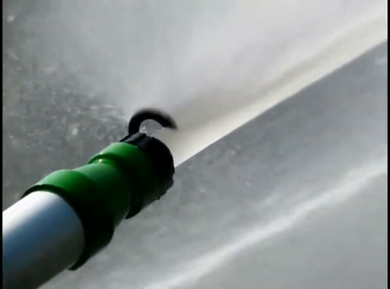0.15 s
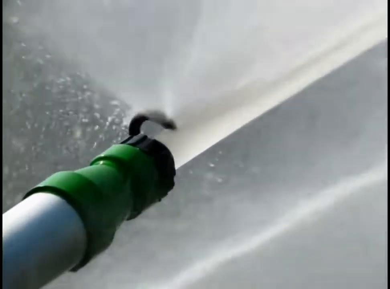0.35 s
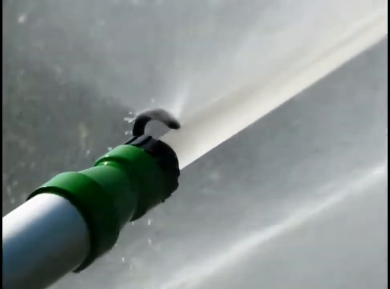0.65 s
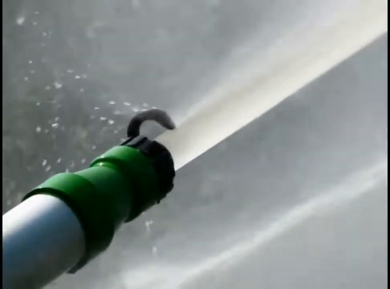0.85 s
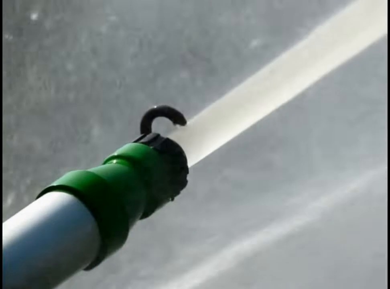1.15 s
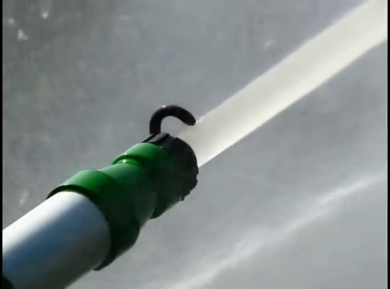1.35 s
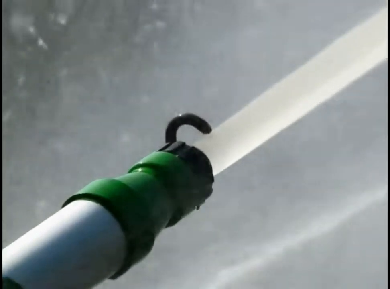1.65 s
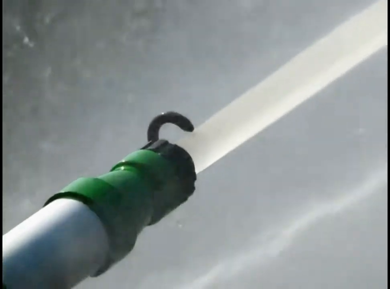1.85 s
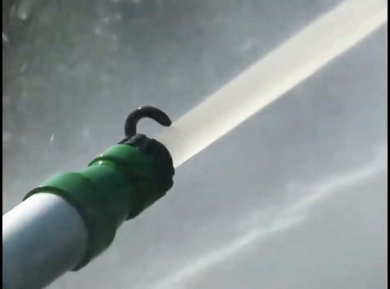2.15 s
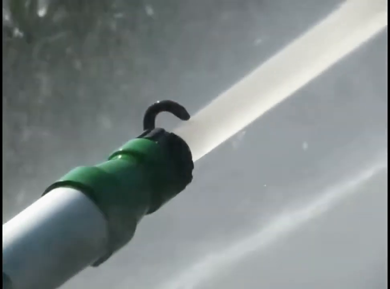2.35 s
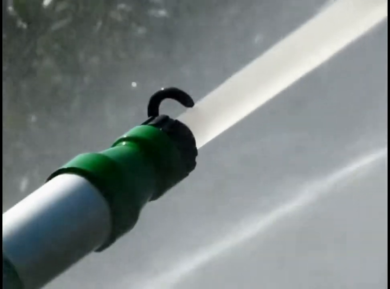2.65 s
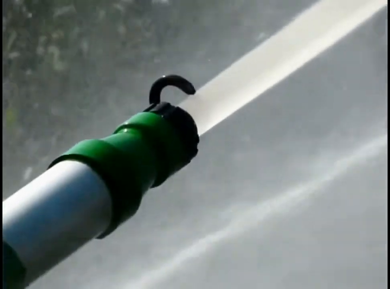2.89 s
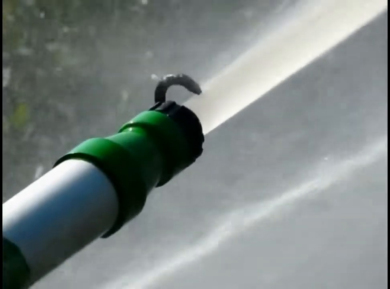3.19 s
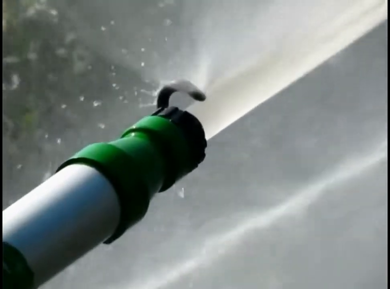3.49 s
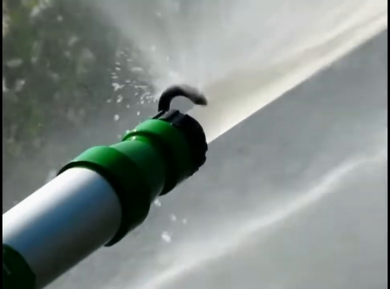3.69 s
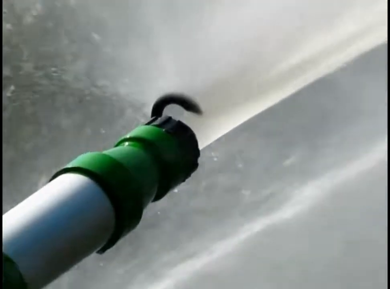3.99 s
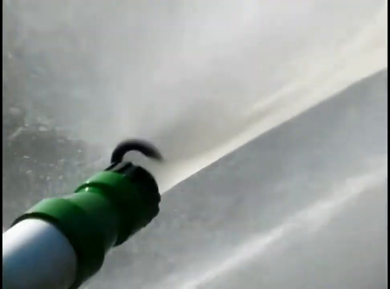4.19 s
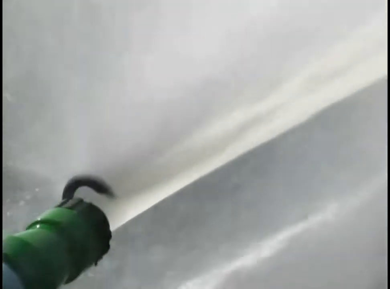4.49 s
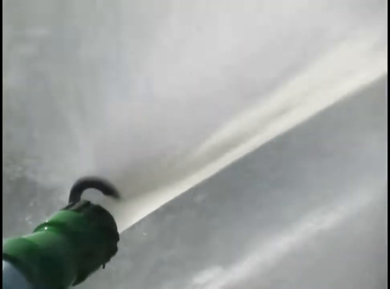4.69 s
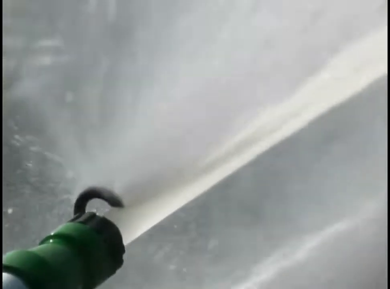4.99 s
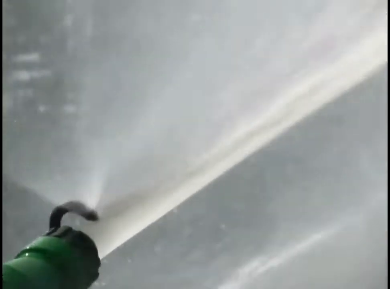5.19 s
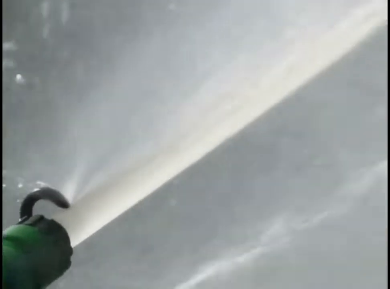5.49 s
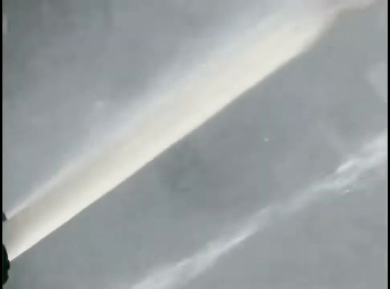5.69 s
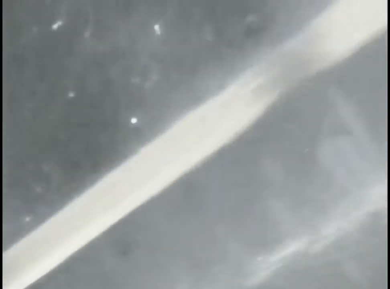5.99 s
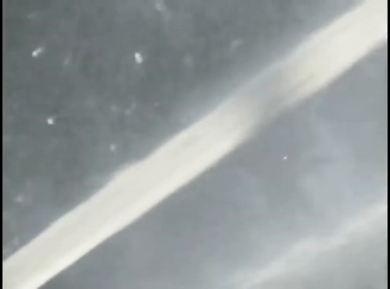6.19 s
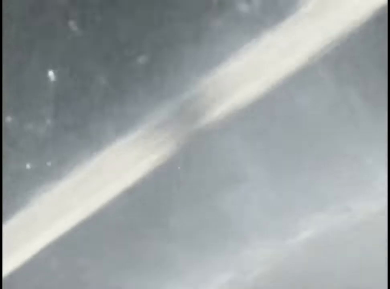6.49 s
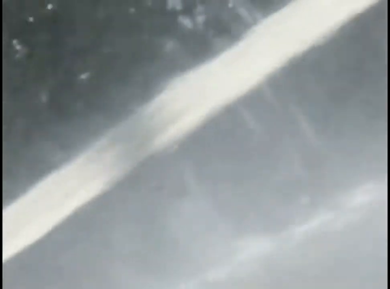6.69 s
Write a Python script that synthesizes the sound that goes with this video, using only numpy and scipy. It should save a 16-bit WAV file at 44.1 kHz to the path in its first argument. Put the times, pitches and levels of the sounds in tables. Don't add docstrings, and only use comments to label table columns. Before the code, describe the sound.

Pressurised water hisses softly outdoors, surges into a loud coarse splatter, thins to faint spray, then returns heavier with hard single drop smacks.

```python
import sys
import numpy as np
from scipy import signal
from scipy.fft import rfft, irfft, next_fast_len
from scipy.io import wavfile

SR = 44100
rng = np.random.default_rng(int(sys.argv[2]) if len(sys.argv) > 2 else 0)


def boost(x):
    u = np.asarray(x, float) / 20
    return 10 ** u


def master_out(mix):
    frames = np.transpose(np.atleast_2d(mix))
    ceiling = np.clip(frames, -1, 1)
    pcm = np.round(ceiling * 32767).astype(np.int16)
    wavfile.write(sys.argv[1], SR, pcm)


N = 302085
STEP = 40
CONTROL_S = np.arange(N // STEP + 2) * STEP / SR
FFT_SIZE = next_fast_len(N)
HZ = np.arange(FFT_SIZE // 2 + 1) * SR / FFT_SIZE


def rms_one(x):
    return x / np.sqrt(np.mean(x ** 2) + 1e-20)


def in_time(rows):
    s, *columns = np.transpose(rows)
    return np.array([np.interp(CONTROL_S, s, column) for column in columns])


def per_sample(control):
    return np.interp(np.arange(N) / STEP, np.arange(len(control)), control)


def at_hz(points, hz):
    table_hz, value = np.transpose(points)
    return np.interp(np.log(hz + 1), np.log(table_hz + 1), value)


def drift(rate_hz):
    r = np.exp(-2 * np.pi * rate_hz * STEP / SR)
    settle = 2000
    noise = rng.standard_normal(len(CONTROL_S) + settle)
    return rms_one(signal.lfilter([1], [1, -2 * r, r * r], noise)[settle:])


def pair(streams, spectrum, likeness, balance, lead):
    shared, left, right = rfft(streams, FFT_SIZE)
    alike = np.clip(at_hz(likeness, HZ), 0, 1)
    turn = np.exp(.5j * at_hz(lead, HZ))
    ports = np.sqrt(alike) * shared * [turn, 1 / turn] + np.sqrt(1 - alike) * np.array([left, right])
    return ports * boost(at_hz(spectrum, HZ) + at_hz(balance, HZ) * np.array([[.5], [-.5]]))


# (t/s, level/dB)
WIND_LEVEL = [
    (0, -65),
    (0.9, -62),
    (1.2, -58),
    (1.4, -67.5),
    (2.8, -70),
    (3.5, -77),
    (4.8, -70),
    (5.17, -68),
    (5.3, -69),
    (6.85, -70.5),
]
# (f/Hz, level/dB per Hz)
WIND_TONE = [(12, -35), (20, -6), (59, 3), (100, -2), (130, -31), (220, -120)]
RUMBLE_TONE = [(59, -39), (100, -9.5), (167, 2), (280, -5.5), (360, -20), (620, -120)]


def wind_and_rumble():
    gust_db, gusts_per_s, rumble_over_wind_db = 2, 6.9, 11
    out, (wind_db,) = 0, in_time(WIND_LEVEL)
    for tone, alike, over_db in [(WIND_TONE, .42, 0), (RUMBLE_TONE, .8, rumble_over_wind_db)]:
        ports = pair(rng.standard_normal((3, N)), tone, [(20, alike)], [(20, -.5)], [(20, 0)])
        gusts_db = gust_db * drift(gusts_per_s)
        sound = rms_one(irfft(ports, FFT_SIZE)[:, :N])
        out = out + sound * per_sample(boost(wind_db + over_db + gusts_db))
    return out


def echoes(first_db, t60):
    lags = rng.uniform(.006, .045, (2, 12))
    lags[1, :8] = lags[0, :8]
    gains = boost(first_db - 60 * lags / t60)
    treble = HZ ** 2 / (HZ ** 2 + 3000 ** 2)
    reflected = sum(gains[:, [k]] * np.exp(-2j * np.pi * HZ * lags[:, [k]]) for k in range(12))
    return 1 + treble * reflected


# (f/Hz, width/Hz, left boost/dB, right boost/dB)
SHELTER_NOTES = [(537, 64, 5.5, 2), (800, 47, 3, 2), (979, 32, 6.5, 7.5), (1196, 47, 7, 7.5),
                 (1511, 30, -1.5, 9), (1634, 51, 9, 6), (2057, 31, 7, 9), (2585, 67, 1, 7.5),
                 (2944, 390, 2.5, 3.5), (3390, 100, 2, 6), (4980, 47, 4.5, -9)]


def shelter_colour():
    response = np.ones((2, len(HZ)), complex)
    for peak_hz, width_hz, left_db, right_db in SHELTER_NOTES:
        peak = 1 / (1 + 2j * (HZ - peak_hz) / width_hz)
        response += (boost(np.array([[left_db], [right_db]])) - 1) * peak
    return response


def patter(per_s, spread_db, cycles):
    lands = rng.random((3, N)) < per_s / SR
    sizes = boost(spread_db * np.minimum(rng.exponential(1, (3, N)), 3.3))
    hits = lands * sizes * rng.choice([-1, 1], (3, N))
    dealt, out = rng.integers(0, 14, (3, N)), 0
    for k, pitch_hz in enumerate(np.geomspace(500, 14000, 14)):
        r, w = boost(-60 * pitch_hz / (cycles * SR)), 2 * np.pi * pitch_hz / SR
        ring = [1, -2 * r * np.cos(w), r * r]
        out = out + signal.lfilter([1 - r * r, 0, r * r - 1], ring, hits * (dealt == k) + 1e-18)
    return rms_one(out)


# (t/s, level/dB, weight: 0 fine and bright, 1 heavy and low)
FALLING_WATER = [(0, -25, -0.04), (0.72, -25, 0.04), (1.12, -23, 0.12), (1.26, -19, -.3),
                 (1.41, -20, -0.16), (1.96, -19, -0.44), (2.25, -19, -0.24), (2.55, -21, -0.22),
                 (2.82, -21, -0), (3.25, -23, 0.02), (3.42, -29, -0.52), (3.6, -34, 0.13),
                 (4.62, -30.5, 0.31), (4.97, -27.5, 0.16), (5.14, -23, 0.77), (6.2, -23, 0.76),
                 (6.6, -22.5, 0.46), (6.85, -23, -0.26)]
# (f/Hz, level/dB)
FULL_WEIGHT = [(300, 7.5), (600, 13), (2000, 5.5), (6000, 0.2), (13000, 0)]


def water(ports, surge_db, surge_rate, patch_db, patch_rate):
    slug_octaves = 0.93
    own_db = 10 * np.log10((np.abs(ports.mean(0)) ** 2).sum() * 2 / FFT_SIZE / N)
    (level_db, weight), (slug_db, slug_hz) = in_time(FALLING_WATER), slugs()
    surge, neighbour, out = drift(surge_rate), drift(patch_rate), 0
    centres = np.log(250) + np.log(2) / 2 * np.arange(13)
    for k, centre in enumerate(centres):
        window = np.interp(np.log(HZ + 1), centres, np.arange(13) == k)
        band_db = level_db - own_db + weight * at_hz(FULL_WEIGHT, np.exp(centre))
        octaves_off = np.log2(np.exp(centre) / slug_hz)
        band_db = band_db + np.exp(-.5 * (octaves_off / slug_octaves) ** 2) @ slug_db
        fresh = drift(patch_rate)
        flicker_db = surge_db * surge + patch_db * (neighbour + fresh)
        neighbour = fresh
        band = irfft(ports * window, FFT_SIZE)[:, :N]
        out = out + per_sample(boost(band_db + flicker_db)) * band
    return out


# (f/Hz, level/dB per Hz)
SPRAY_TONE = [(150, -28), (260, -14), (572, -8.5), (864, -8.5), (1200, -4.5), (1370, -5.5), (1600, -5),
              (1840, -4), (2550, -2), (5060, -4), (7900, 0.5), (12600, -6), (15700, -9)]
# (f/Hz, left lead/rad)
SPRAY_PORTS = [
    [(130, .6), (600, .75), (1500, .6), (2500, .45), (4500, .42), (7500, .6), (10000, .45), (15000, .35)],
    [(60, -0.5), (110, -1.0), (200, -0.5), (380, -2.0), (700, -2.0), (1290, -3.5), (2380, -4.0), (4400, -0.5), (8120, 0.5), (15000, -1.0)],
    [(0, 0), (900, -.5), (2300, 0), (3700, .7), (5200, 0), (9500, -.5), (11300, 0), (14000, .7)],
]


def spray(walls):
    streams = rng.standard_normal((3, N)) + .5 * patter(per_s=1500, spread_db=3.0, cycles=6.5)
    ports = pair(streams, SPRAY_TONE, *SPRAY_PORTS)
    hollow = 1 + .5 / (1 + 2j * (HZ - 610) / 130)
    coloured = ports * walls * shelter_colour() ** 0.35 * hollow
    return water(coloured, surge_db=.5, surge_rate=26.0, patch_db=0.22, patch_rate=14.0)


# (f/Hz, level/dB per Hz)
JET_TONE = [(150, -55), (260, -26), (336, -13.5), (716, -16), (780, -5.5), (910, -10), (1180, -7),
            (1840, -3), (2070, -1), (2260, -2.5), (8180, 0.5), (14200, -8), (15700, -12.5)]
# (f/Hz, left lead/rad)
JET_PORTS = [
    [(130, .9), (500, .75), (1500, .65), (2500, .5), (4500, .5), (5600, .65), (8500, .6), (10000, .42), (12000, .55), (15000, .45)],
    [(60, 0.0), (110, -0.5), (200, -0.5), (380, -1.5), (700, -3.0), (1290, -3.0), (2380, -4.5), (4400, -1.5), (8120, -0.5), (15000, -1.0)],
    [(0, 0), (1000, -.5), (2200, 0), (3200, .2), (5000, 0), (7400, -.6), (9700, -.4), (11000, -2.2), (13000, -2.1), (14200, -1)],
]


def jet(walls, coarse):
    streams = rng.standard_normal((3, N)) + coarse * patter(per_s=900, spread_db=3.5, cycles=9.2)
    ports = pair(streams, JET_TONE, *JET_PORTS)
    coloured = ports * walls * shelter_colour()
    return water(coloured, surge_db=1.09, surge_rate=42.0, patch_db=0.32, patch_rate=71.0)


# (t/s, level/dB, f/Hz,
# length/s)
SLUG_LANDINGS = [(1.187, 6.5, 350, 0.033), (1.26, 3.5, 10000, 0.023), (1.318, 6.5, 1990, 0.015),
                 (1.36, -3, 500, 0.018), (1.697, 2.5, 7000, 0.013), (1.76, 3.5, 4000, 0.016),
                 (2.04, 2.5, 8000, .025), (2.2, 1.5, 2200, 0.06), (2.305, -3.5, 2500, 0.026),
                 (2.445, 3, 1800, 0.043), (2.56, -4, 2500, 0.013), (2.66, 4, 3000, 0.016),
                 (2.76, 1, 1800, 0.014), (2.837, 7, 500, 0.045), (2.845, 3.5, 8000, 0.023),
                 (3.016, 3, 8000, 0.023), (3.058, 2.5, 3500, 0.0069), (3.9, -2, 19000, 0.25),
                 (4.5, 1, 550, .25), (5.059, 1.5, 4000, 0.017), (5.17, 3, 800, 0.012),
                 (5.3, 2.5, 450, 0.05), (5.39, 0, 3000, 0.02), (5.69, 2, 3000, .02), (5.852, -4, 2000, .02),
                 (5.907, 5, 500, 0.016), (6.047, 3, 9000, 0.023), (6.181, 2.5, 1200, 0.018),
                 (6.302, 2.5, 2000, 0.084), (6.726, 4, 6000, .025)]


def slugs():
    s, db, pitch_hz, length = np.transpose(SLUG_LANDINGS)[:, :, None]
    return db * np.exp(-.5 * ((CONTROL_S - s) / length) ** 2), pitch_hz[:, 0]


# (t/s, peak level/dB, f/Hz)
HEAVY_DROPS = [(1.259, -6, 8520), (1.324, -13, 7810), (1.359, -8.5, 3240), (1.746, -6.5, 2960),
               (3.127, -8, 4970), (3.261, -12, 3370), (3.311, -10.5, 3430), (4.74, -8, 8630),
               (4.856, -11, 7490), (4.906, -14, 2600), (5.039, -11, 6970), (5.046, -8, 7110),
               (5.06, -10, 7920), (5.155, -7.5, 3000), (5.173, -13, 800), (5.174, -7.5, 1620),
               (5.206, -13, 3420), (5.28, -21, 1340), (5.289, -4, 5420), (5.311, -14, 1140),
               (5.335, -15, 1500), (5.4205, -1.5, 4600), (5.555, -16, 1220), (5.692, -17, 1600),
               (5.822, -11, 3060), (5.907, -12, 7240), (6.003, -5, 6240), (6.033, -14, 3300),
               (6.075, -6, 4700), (6.225, -11, 2100)]


def drops():
    ring_cycles, lean_db = 7, 2
    out, t = np.zeros((2, N + 2000)), np.arange(2000) / SR
    for s, peak_db, pitch_hz in HEAVY_DROPS:
        turns = pitch_hz * t
        snap = np.sin(2 * np.pi * turns) * turns * boost(-60 * turns / ring_cycles)
        at = round((s + .0008) * SR)
        pan_db = at_hz(JET_PORTS[1], pitch_hz) - lean_db
        side_db = np.array([[.5], [-.5]]) * pan_db
        out[:, at:at + len(t)] += snap / snap.max() * boost(peak_db - 3 + side_db)
    no_bass = signal.butter(2, 500, "high", fs=SR, output="sos")
    return signal.sosfilt(no_bass, out[:, :N])


def duck():
    duck_s, duck_db, recover_db_per_s = 5.428, 2.5, 4.5
    since = np.arange(N) / SR - duck_s
    step_down = np.clip(since / 0.0036, 0, 1)
    return boost(-step_down * np.maximum(duck_db - recover_db_per_s * since, 0))


# (t/s, share of the water 0-1, coarseness of its drops 0-1)
JET_SWEEPS = [
    (0, 0.01, 1),
    (1.0, 0.06, 0.23),
    (1.25, 0.71, 0.5),
    (3.3, 1, 0.55),
    (3.5, 0.01, 1),
    (4.6, 0.01, 0.67),
    (4.95, 0.58, 0.66),
    (5.1, 0.95, 0.66),
    (6.85, 0.92, 0.41),
]


def scene():
    share, coarse = (np.clip(per_sample(curve), 0, 1) for curve in in_time(JET_SWEEPS))
    walls = echoes(first_db=-16.5, t60=.25)
    falling = np.sqrt(1 - share) * spray(walls) + np.sqrt(share) * jet(walls, coarse)
    return falling + drops() + wind_and_rumble()


def band_limit(x):
    return signal.sosfilt(signal.butter(12, 15970, fs=SR, output="sos"), x)


def record(dry):
    top = 1.05
    rounded = top * np.tanh(duck() * dry / top)
    cut = signal.cheby2(20, 60, 15960, fs=SR, output="sos")
    return band_limit(signal.sosfilt(cut, rounded))


dry = scene()
out = record(dry)
master_out(out)
```